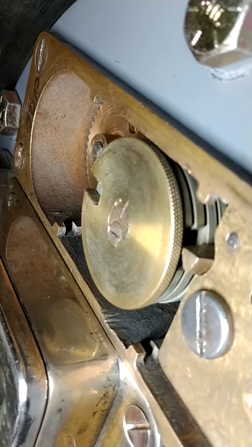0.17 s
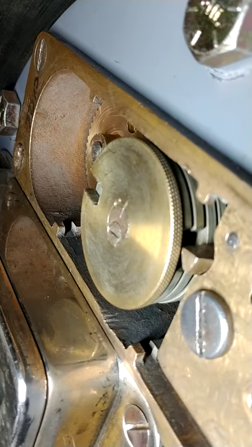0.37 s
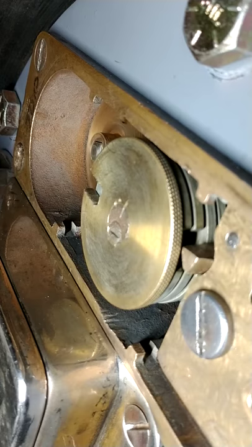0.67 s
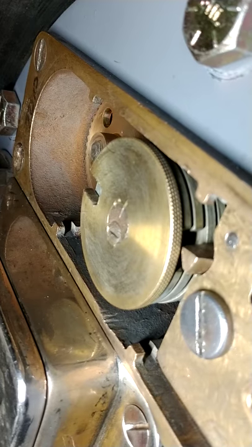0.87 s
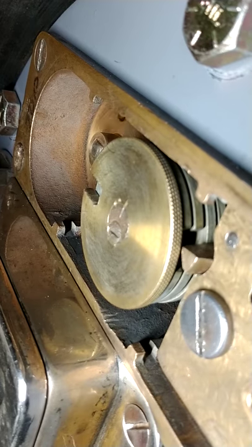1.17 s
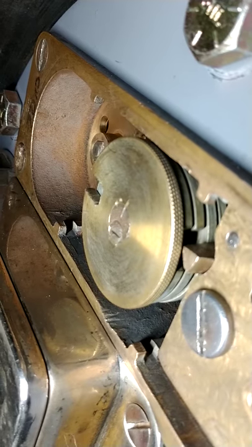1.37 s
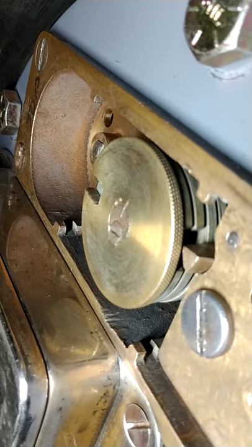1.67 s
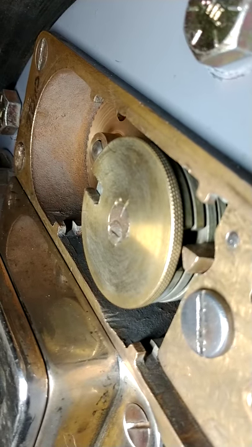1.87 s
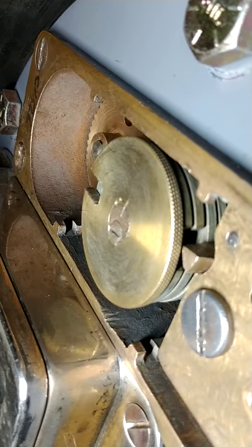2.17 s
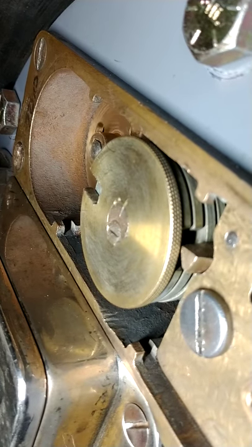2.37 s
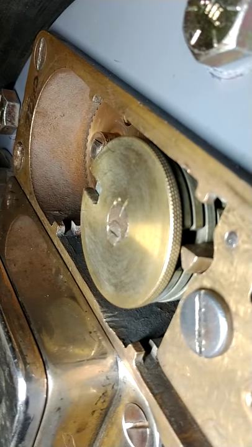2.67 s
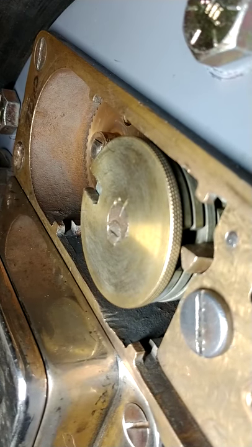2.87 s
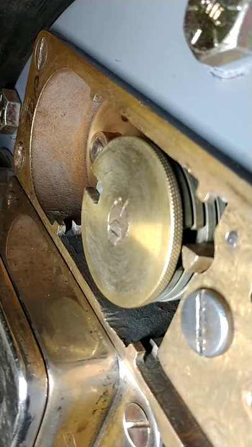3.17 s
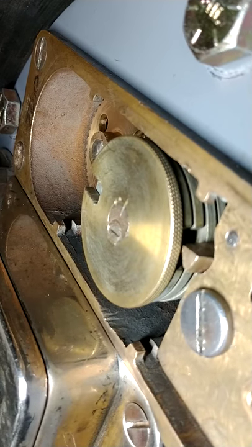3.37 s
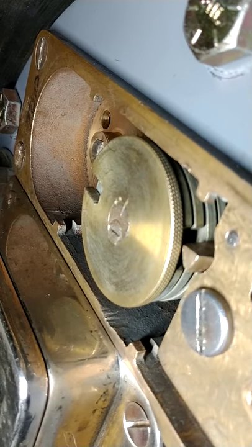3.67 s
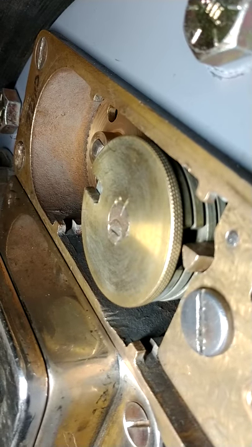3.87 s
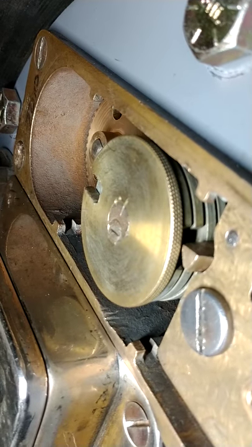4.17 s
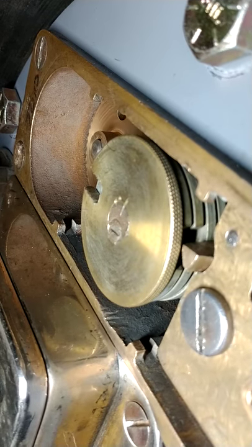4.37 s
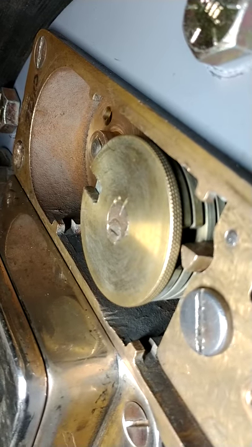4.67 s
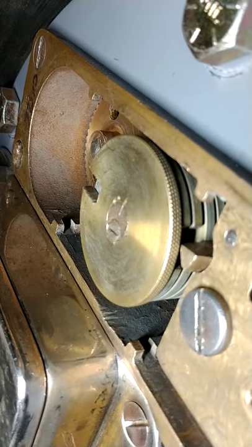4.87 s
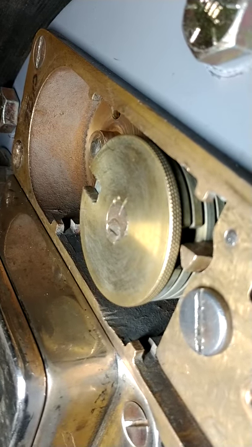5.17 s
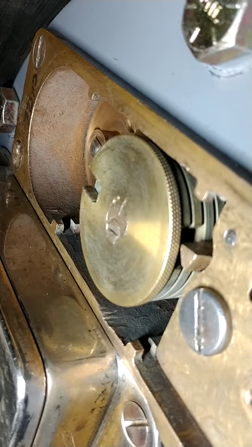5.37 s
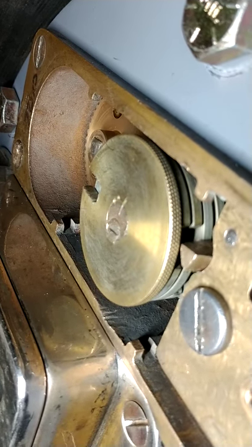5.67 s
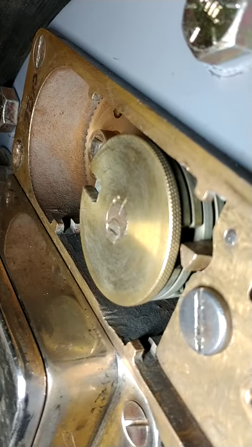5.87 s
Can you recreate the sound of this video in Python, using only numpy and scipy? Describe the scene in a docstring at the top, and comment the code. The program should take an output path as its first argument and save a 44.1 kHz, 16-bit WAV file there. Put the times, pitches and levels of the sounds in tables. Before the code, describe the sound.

Very close to a combination lock in a small room, brass wheels are turned by hand. After half a second of hiss, a dense loud cluster of pinging clinks and rasping erupts, then lighter tooth-tick runs, scattered clicks, a second strong cluster around three seconds, a pause, and sparser ticks to the end. A thin high electronic sizzle sits to the right.

```python
"""A small room, the microphone pair close to a combination safe lock whose brass wheel pack is turned by hand.
Gear teeth tick past in runs; single clinks and the stronger tooth ticks knock, ping and ring the wheels.
Struck parts are decaying modes plus coloured noise bursts; rubbing brass is a dense run of tiny random slips.
Short diffuse reflections follow. Behind lie a faint door rumble with dull bumps, hiss and, to the right,
a thin wavering high band of narrow noises: electronic sizzle, plus treble of the loud clinks near .74 s."""
import sys
import numpy as np
from scipy import signal
from scipy.fft import rfft, irfft, next_fast_len
from scipy.io import wavfile

SR = 44100
rng = np.random.default_rng(int(sys.argv[2]) if len(sys.argv) > 2 else 0)


def dump(signal):
    """Clip the signal to [-1, 1] and save it as 16-bit WAV at the path in sys.argv[1]."""
    limited = np.clip(np.atleast_2d(signal).T, -1, 1)
    pcm = np.round(limited * 32767).astype(np.int16)
    wavfile.write(sys.argv[1], SR, pcm)


N = 265305  # samples, about 6 s
TIME = np.arange(N) / SR
RING_TIME = np.arange(SR // 3) / SR  # time axis of one ring or reflection tail
# Levels in the tables are relative: each layer gets its own gain on top.
# side_db is left over right; t60_s is the time to fall by 60 dB.


def amp(db):
    """Decibels to gain."""
    return 10 ** (np.asarray(db) / 20)


def unit(x):
    """Scales to rms 1."""
    return x / np.sqrt(np.mean(x ** 2) + 1e-20)


def read(points, hz):
    """Joins (Hz, value) points on a log-frequency axis."""
    f, value = np.transpose(points)
    return np.interp(np.log(hz + 1), np.log(f), value)


def sides(balance_db):
    """Left and right gains of mean power 1."""
    pair = amp(np.array([np.atleast_1d(balance_db), -np.atleast_1d(balance_db)]) / 2)
    return pair / np.sqrt(np.mean(pair ** 2, 0))


def dying(t60):
    """Exponential amplitude envelope of a free vibration."""
    return np.exp(-np.log(1000) * RING_TIME / max(t60, 1e-4))


ATTACK = (1 - dying(0.0038)) ** 2  # soft onset of every ringing mode


def add(mix, s, sound):
    """Mixes a sound in at time s."""
    part = mix[..., max(round(s * SR), 0):][..., :sound.shape[-1]]
    part += sound[..., :part.shape[-1]]


def arch(first, middle, last, count):
    """Samples a parabola through its first, middle and last values."""
    u = np.linspace(0, 1, count)
    bend = 2 * (2 * middle - first - last)
    return first + (last - first) * u + bend * u * (1 - u)


def colour(x, points, size=4096):
    """Minimum-phase filter of unit energy with the given spectrum."""
    hz = abs(np.fft.fftfreq(size, 1 / SR))
    log_gain = np.log(amp(read(points, hz)))
    spectrum = np.exp(np.conj(signal.hilbert(log_gain)))
    taps = np.fft.ifft(spectrum).real[:size // 2]
    return signal.oaconvolve(x, taps[None] / np.linalg.norm(taps), axes=1)[:, :N]


def noise_pair(likeness, size):
    """Left and right noises with the given correlation."""
    a, b = rng.standard_normal((2, size))
    c = np.clip(likeness, 0, 1)
    return np.array([a, c * a + np.sqrt(1 - c * c) * b])


def bursts(times, levels_db, crack_t60, body_t60, body_db, likeness, rise_t60=0.0062):
    """Each contact builds, cracks, then dies away in the dense modes of the metal, heard as noise."""
    power = np.zeros(N)
    crack = dying(crack_t60) ** 2
    body = (amp(body_db) * dying(body_t60)) ** 2
    shape = (crack + body) * (1 - dying(rise_t60)) ** 2
    for s, db in zip(times, levels_db):
        add(power, s, amp(db) ** 2 * shape)
    return np.sqrt(power) * noise_pair(likeness, N)


def ringing(modes, times, drive_db, scatter_db, spread):
    """Strikes modes with drive_db of shape (blows, modes); each blow lands on a slightly different spot."""
    out = np.zeros((2, N))
    chance = rng.standard_normal((len(times), len(modes), 2))
    left_phase = spread * rng.standard_normal(len(modes))  # radians, left microphone only
    for k, (hz, db, t60, side_db) in enumerate(modes):
        envelope = np.sqrt(2) * amp(db) * dying(t60) * ATTACK
        wave = (envelope * np.exp(2j * np.pi * hz * RING_TIME))[:int(t60 * SR) + 200]
        pair = sides(side_db) * np.exp(1j * left_phase[k] * np.array([[1], [0]])) * wave
        for s, blow_db, (luck, lag) in zip(times, drive_db[:, k], chance[:, k]):
            add(out, s, amp(blow_db + scatter_db * luck) * (pair * np.exp(.5j * lag)).imag)
    return out


# Left-right balance of sound through the plates: hz [Hz], side_db [dB]
PLATE_SIDE = [(500, -2.5), (1050, -7), (1750, 7), (2400, 0), (3100, -6), (3750, -20), (4700, -10.5),
              (6500, -8.5), (8500, -4), (11000, -3.5), (13000, -17.5)]


def at_microphones(x, lag_s=0.0002):
    """Plate sound reaches each microphone at a level set by its frequency, the left one slightly later."""
    size = next_fast_len(N + len(RING_TIME))
    hz = np.fft.rfftfreq(size, 1 / SR)
    delay = np.exp(-2j * np.pi * hz * np.array([[lag_s], [0]]))
    return irfft(rfft(x, size) * sides(read(PLATE_SIDE, hz)) * delay, size)[:, :N]


# Colour of a knock through the lock plates: hz [Hz], level_db [dB]
KNOCK_COLOUR = [(60, -58), (300, -30.5), (500, -16), (660, -17.5), (950, -6.5), (1180, -7.5), (1550, -1),
                (2300, -3.5), (3150, 9), (3550, 7.5), (4700, 9.5), (6200, 1.5), (8500, -18), (16000, -30.5)]
# Short-lived modes of the lock plates: pitch_hz [Hz], level_db [dB], t60_s [s], side_db [dB]
PLATE_MODES = [(958.7, -7, 0.098, -10), (1160, -6, 0.035, -8.5), (1367, -8.5, 0.022, -1),
               (1526, -2.5, 0.022, -2), (1750, -6, 0.038, 5), (1976, -3.5, 0.034, 0.5),
               (2358, -8.5, 0.034, 3), (2622, -6, 0.04, -15), (2726, -6.5, 0.048, 0), (3085, 3, 0.025, -6),
               (3200, -5, 0.088, -10), (3206, 0, 0.11, -7), (4620, -3, 0.05, -7.5),
               (5525, -10.5, .11, -3.5)]


def knocks(blows):
    """Every contact knocks on the plates and rings their modes briefly."""
    s, db = blows[:, 0], blows[:, 1]
    crack = bursts(s, db, crack_t60=0.0047, body_t60=0.058, body_db=-3, likeness=.4)
    crack = at_microphones(colour(crack, KNOCK_COLOUR))
    drive_db = db[:, None] + np.zeros(len(PLATE_MODES))
    ring = ringing(PLATE_MODES, s, drive_db, scatter_db=3, spread=1.64)
    return amp(-0.5) * crack + amp(-13.0) * ring


def pings(blows, t60=0.034, harder=0.51, rise_t60=0.0075, side_db=-16,
          low_hz=3875, high_hz=4180, after_db=-13, after_t60=0.11):
    """The sharp ping of the mechanism; a close pair of modes beats on after it, more so when struck hard."""
    out = np.zeros(N)
    low_wave = np.sin(2 * np.pi * low_hz * RING_TIME)
    high_wave = np.sin(2 * np.pi * high_hz * RING_TIME)
    rise = (1 - dying(rise_t60)) ** 2
    for s, _, db, hz in blows:
        strike = dying(t60) * np.sin(2 * np.pi * hz * RING_TIME)
        high = np.clip((hz - low_hz) / (high_hz - low_hz), .15, .85)  # share of the upper mode
        pair = (1 - high) * low_wave + high * high_wave
        beat = amp(after_db + harder * max(db + 32, 0)) * dying(after_t60) * pair
        add(out, s, np.sqrt(2) * amp(db) * (strike + beat) * rise)
    return amp(-0.5) * out * sides(side_db)


# Brass wheel modes, low to high: pitch_hz [Hz], level_db [dB], t60_s [s], side_db [dB]
WHEEL_MODES = [(5597, -6, .14, -1), (5648, -3, .15, -3), (6622, -10, .17, -2), (7299, -10, .1, -4),
               (7351, -4, .13, -8), (7546, -9, .12, -6), (8349, -12, .13, 0), (10222, -9, .15, -4),
               (10553, -6, .17, -5), (13019, -7, .14, -12), (13578, -4, .1, -6), (14420, -11, .1, -18)]


def wheels(blows):
    """Every contact rings the wheels; brighter ones wake the higher modes."""
    s, _, _, _, ring_db, tilt_db = blows.T
    hz = np.array(WHEEL_MODES)[:, 0]
    drive_db = ring_db[:, None] + tilt_db[:, None] * np.log2(hz / hz[0])
    return ringing(WHEEL_MODES, s, drive_db, scatter_db=3, spread=1.6)


# Dull thuds of the case as a wheel takes up the load: start_s [s], thud_db [dB], boom_db [dB]
LOAD_THUDS = [(0.561, -43.5, -62), (.752, -41, -53), (.812, -32.5, -50), (1.158, -64, -52.5),
              (1.973, -51.5, -62), (2.442, -36, -52), (2.655, -40, -60), (3.089, -42, -57),
              (3.107, -32, -50), (4.349, -67, -94.5), (4.648, -33, -51.5), (5.451, -35, -59),
              (5.991, -51.5, -53.5)]
# Bright snaps of an edge slipping free: start_s [s], level_db [dB]
EDGE_SNAPS = [(0.538, -25), (.75, -19), (2.437, -24), (2.998, -39), (4.525, -39), (4.646, -18)]
# Overtones of a hard ping: pitch_hz [Hz], level_db [dB], t60_s [s], side_db [dB]
PING_OVERTONES = [(4889, 0, .14, -5), (5459, -3, .11, -10)]
# Hollow boom of the case: pitch_hz [Hz], level_db [dB], t60_s [s], side_db [dB]
CASE_BOOM = [(495, -1.5, 0.059, -4.5)]
# Colour of the hollow lock case: hz [Hz], level_db [dB]
CASE_COLOUR = [(60, -59), (250, -34.5), (400, -21), (490, -1.5), (620, -15), (720, -11), (800, 1.5),
               (890, -5.5), (970, 10), (1120, -1), (1350, -18.5), (1750, -17), (3000, -30.5), (8000, -52)]
# Colour of a hard edge-on snap: hz [Hz], level_db [dB]
SNAP_COLOUR = [(1000, -29), (4500, -3.5), (7000, -4.5), (9000, 0), (11000, 5.5), (13000, 5.5),
               (15800, -8.5)]
THUD_UNDER_DB = -17  # a clink's thud relative to its knock
SNAP_FROM_DB, SNAP_GROWTH = -24, 1.7  # snap equals knock at this level; dB of snap per dB of knock
OVERTONE_FROM_DB, OVERTONE_GROWTH = -12, 1.4  # likewise for overtones against the ping


def clinks(strong):
    """Strong contacts also thud the case and, the harder the blow, have more overtones and snap."""
    s, knock_db, ping_db = strong.T[:3]
    loads = np.array(LOAD_THUDS)
    clink_thuds = np.column_stack([s, knock_db + THUD_UNDER_DB])
    thuds = np.vstack([clink_thuds, loads[:, :2]])
    clink_snap_db = SNAP_FROM_DB + SNAP_GROWTH * (knock_db - SNAP_FROM_DB)
    snaps = np.vstack([np.column_stack([s, clink_snap_db]), EDGE_SNAPS])
    overtone_db = OVERTONE_FROM_DB + OVERTONE_GROWTH * (ping_db - OVERTONE_FROM_DB)
    drive_db = overtone_db[:, None] + np.zeros(len(PING_OVERTONES))
    overtones = ringing(PING_OVERTONES, s, drive_db, scatter_db=3, spread=1.6)
    boom = ringing(CASE_BOOM, loads[:, 0], loads[:, 2:], scatter_db=1, spread=.3)
    thud = bursts(*thuds.T, crack_t60=0.035, body_t60=0.069, body_db=-3.5, likeness=0.75, rise_t60=.005)
    thud = colour(thud, CASE_COLOUR) * sides(-4)
    snap = bursts(*snaps.T, crack_t60=.012, body_t60=0.046, body_db=-2.5, likeness=0.93)
    snap = at_microphones(colour(snap, SNAP_COLOUR))
    return amp(-23) * overtones + amp(-3.0) * thud + amp(-3.0) * boom + amp(-4.5) * snap


# Runs of gear teeth; a push may hold more than one run: start_s [s], teeth [count],
# gap_start_s, gap_mid_s, gap_end_s [s between teeth]
TOOTH_RUNS = [(1.187, 11, .0221, .0171, .038), (2.4803, 9, .0274, .0189, .0343),
              (3.1405, 13, .0178, .0161, .0301), (4.525, 4, .025, .028, .029),
              (4.6758, 6, .0278, .0226, .0366), (5.3627, 14, .0275, .0277, .0317)]
# Force of each run: knock_start_db, knock_mid_db, knock_end_db [dB], ping_start_db, ping_end_db [dB over
# knock], pitch_hz [Hz, mean ping], ring_db [dB, wheel ring over knock]
TOOTH_FORCE = [(-46, -38.5, -41.5, 5.5, -4, 4170, -11.5), (-40.5, -46.5, -43, 3.5, 1, 3600, -12.5),
               (-39, -35.5, -40, -6, -7, 4120, -11.5), (-54, -59.5, -52, 5, 2, 4230, -8.5),
               (-41.5, -46.5, -58, 3, 2.5, 4160, -14), (-46, -44, -51.5, 13, -9, 3950, -22.5)]
TOOTH_SCATTER_DB, TOOTH_PING_SCATTER_DB, TOOTH_SCATTER_HZ = 2.5, 3, 60  # no two teeth meet alike
TOOTH_TILT_DB = -13.5  # dB per octave: these teeth wake the high wheel modes less


def teeth():
    """Gear teeth tick past at the speed of the hand; gives rows like those of STRONG_CONTACTS."""
    rows = []
    for (start, count, *gaps), force in zip(TOOTH_RUNS, TOOTH_FORCE):
        first, middle, last, ping_first, ping_last, hz, ring_db = force
        s = start + np.append(0, np.cumsum(arch(*gaps, count=count - 1)))
        luck, spot, detune = rng.standard_normal((count, 3)).T
        knock_db = arch(first, middle, last, count=count) + TOOTH_SCATTER_DB * luck
        ping_db = knock_db + np.linspace(ping_first, ping_last, count) + TOOTH_PING_SCATTER_DB * spot
        ping_hz = hz + TOOTH_SCATTER_HZ * detune
        tilt_db = np.full(count, TOOTH_TILT_DB)
        rows.append(np.column_stack([s, knock_db, ping_db, ping_hz, knock_db + ring_db, tilt_db]))
    return np.vstack(rows)


SLIDE_FALL_DB, SLIDE_FALL_BEND = 32, 1.3  # fall reached at end_s; above 1 it starts slowly


def slide(start, fullest, end):
    """Strength of one slide: it swells smoothly, then dies away, still falling past its end."""
    swell = np.sin(np.pi / 2 * np.clip((TIME - start) / (fullest - start), 0, 1)) ** 2
    fall = np.clip((TIME - fullest) / (end - fullest), 0, 2) ** SLIDE_FALL_BEND
    return swell * amp(-SLIDE_FALL_DB * fall)


# Wheels sliding on each other: start_s, fullest_s, end_s [s], rasp_db [dB, on the rims],
# drag_db [dB, on the case]
WHEEL_SLIDES = [(.6, .73, .88, -24, -46), (1.14, 1.27, 1.55, -45.5, -87), (1.708, 1.82, 2.1, -47, -58),
                (2.3, 2.665, 2.73, -45, -65), (3.68, 3.74, 4.03, -50, -88), (4.443, 4.698, 4.9, -51.5, -73),
                (5.19, 5.256, 5.33, -61, -66.5), (5.45, 5.7, 5.8, -58.5, -67)]
# Tones that the rims sing when rubbed: pitch_hz [Hz], level_db [dB], t60_s [s]
RIM_TONES = [(3280, -14, .1), (3900, -2, .2), (4030, 0, .22), (4230, -4, .12), (4950, -7, .12),
             (5600, -6, .15)]
# Colour of the rasp: hz [Hz], level_db [dB]
RASP_COLOUR = [(300, -55), (1500, -31), (2900, -24.5), (3600, -12.5), (3900, 15.5), (4200, 4.5),
               (4450, -2.5), (4750, -1.5), (5400, -14.5), (6700, -14), (8500, -31), (16000, -44)]


def rubbing():
    """Brass on brass: many tiny slips, each a short rasp that sounds the case and sets the rims singing."""
    slips_per_s, uneven_db, slip_t60, smooth = 320, 2.5, .012, .6  # smooth: steady part of the grain
    slips = (rng.random(N) < slips_per_s / SR) * amp(uneven_db * np.minimum(rng.exponential(1, N), 3))
    slip_power = signal.oaconvolve(slips ** 2, dying(slip_t60) ** 2)[:N]
    grain = unit(smooth + unit(np.sqrt(abs(slip_power))))
    pressure = sum(amp([[rasp_db], [drag_db]]) * slide(*times) for *times, rasp_db, drag_db in WHEEL_SLIDES)
    on_rims, on_case = grain * pressure
    scrape = on_rims * noise_pair(0.4, N)
    rim = sum(amp(db) * dying(t60) * np.sin(2 * np.pi * hz * RING_TIME) for hz, db, t60 in RIM_TONES)
    rim = rim * (1 - dying(.008)) ** 2  # soft onset
    sing = signal.oaconvolve(scrape, rim[None] / np.linalg.norm(rim), axes=1)[:, :N]
    drag = colour(on_case * noise_pair(0.63, N), CASE_COLOUR) * sides(-7.5)
    rasp = colour(scrape, RASP_COLOUR)
    return at_microphones(amp(-4) * rasp + amp(-7) * sing) + amp(-2.0) * drag


def room(x, gap_s=0.0016):
    """Diffuse reflections of a small room, fading in after a short gap; the treble dies first."""
    hz, t, z = signal.stft(rng.standard_normal((2, len(RING_TIME))), SR, nperseg=256)
    t60 = read([(900, .26), (4000, .24), (9000, .17)], hz)[:, None]  # (Hz, s)
    tail = signal.istft(z * np.exp(-np.log(1000) * t / t60), SR, nperseg=256)[1][:, :len(RING_TIME)]
    tail = tail * np.clip(RING_TIME / gap_s - 1, 0, 1)
    return signal.oaconvolve(x, tail / np.linalg.norm(tail[0]), axes=1)[:, :N]


# Dull bumps of the door: start_s [s], level_db [dB]
DOOR_BUMPS = [(.748, -56), (.795, -63.5), (5.507, -53.5), (5.54, -64), (5.779, -68.5), (5.862, -71.5)]
# Colour of the door's rumble and bumps: hz [Hz], level_db [dB]
DOOR_COLOUR = [(20, -25), (45, -11.5), (80, 0), (150, 1), (260, -5.5), (450, -17), (900, -25.5)]
RUMBLE_DB = -85.5


def door():
    """The heavy door rumbles faintly and bumps under the hand: low-coloured noise, steady and in bursts."""
    s, db = np.transpose(DOOR_BUMPS)
    bumps = bursts(s, db, crack_t60=0.075, body_t60=.25, body_db=-10.5, likeness=0.96, rise_t60=0.0091)
    rumble = amp(RUMBLE_DB) * noise_pair(0.16, N)
    return colour(bumps * sides(-11.0) + rumble, DOOR_COLOUR)


# Colour of the steady hiss: hz [Hz], level_db [dB]
HISS_COLOUR = [(100, 2.5), (1000, 0.5), (3500, 0.5), (6000, -6), (8000, -3), (10000, 8), (11500, 9),
               (13000, 11.5), (15700, 13), (16000, -6.5)]


def steady_hiss(hiss_db=-73):
    """Independent coloured noise at each microphone."""
    return amp(hiss_db) * colour(rng.standard_normal((2, N)), HISS_COLOUR)


# Narrow bands of the high noise: pitch_hz [Hz], width_hz [Hz], level_db [dB]
HIGH_BANDS = [(11550, 25, -10), (12017, 36, -1), (12055, 70, 2), (12260, 50, -12.5), (13000, 110, -5),
              (12700, 60, -1.5), (13440, 120, -12), (13900, 53, -20), (14600, 88, -2), (14800, 50, -4.5),
              (15200, 55, -10.5), (15200, 46, -5.5)]
# Strength of the high band, sizzle plus treble of the loud clinks at .74 s: start_s [s], level_db [dB]
HIGH_BAND_STRENGTH = [(0, -57), (.5, -56.5), (.74, -46), (.99, -58), (3.64, -57), (3.99, -52.5),
                      (4.25, -57.5), (6.02, -59.5)]


def high_band(side_db=-30, waver_db=1.3):
    """Electronic sizzle and loud clinks' treble: narrow-band noise far right, wavered by 1 to 14 Hz sines."""
    hz = np.fft.rfftfreq(N, 1 / SR)
    bands = sum(amp(db) ** 2 / abs(width) / (1 + ((hz - f) / width) ** 2) ** 2 for f, width, db in HIGH_BANDS)
    noise = unit(irfft(rfft(rng.standard_normal(N)) * np.sqrt(bands), N))
    rates_hz = np.geomspace(1, 14, 20)
    waver = unit(sum(np.sin(2 * np.pi * (f * TIME + rng.random())) / np.sqrt(f) for f in rates_hz))
    level_db = np.interp(TIME, *np.transpose(HIGH_BAND_STRENGTH)) + waver_db * waver
    return amp(3.5) * amp(level_db) * noise * sides(side_db)


# Single clinks and the stronger tooth ticks of the lock: start_s [s], knock_db [dB], ping_db [dB],
# pitch_hz [Hz, ping], ring_db [dB, wheel ring], tilt_db [dB per octave, brightness of the ring]
STRONG_CONTACTS = [(.539, -29.5, -21.5, 4054, -23, -12), (.625, -37, -32, 4190, -48.5, -9),
                   (.651, -28, -24.5, 4200, -34.5, -2.5), (.662, -32, -30.5, 4250, -33.5, -18),
                   (.678, -26, -13, 3980, -26, -14.5), (.693, -27, -17.5, 3955, -32, -5),
                   (.712, -32.5, -15, 4280, -35, 8), (.724, -28.5, -16.5, 4190, -34.5, 10.5),
                   (.737, -27, -9, 4177, -37.5, 10), (.75, -27, -6.5, 4143, -26, -0.5),
                   (.793, -16, -14, 4180, -24.5, -10), (.812, -24, -19, 3840, -29, -9),
                   (.83, -22.5, -9.5, 3964, -29.5, -7.5), (.859, -27, -16, 4020, -36, 0.5),
                   (1.152, -46, -34, 4004, -41, -40), (1.226, -58, -41, 4170, -40, -24),
                   (1.296, -42, -25.5, 4240, -43, -5.5), (1.341, -35, -23, 4177, -65, -10),
                   (1.411, -47.5, -31, 4216, -53, -10), (1.441, -39, -29, 4106, -38, -40),
                   (1.825, -54, -25, 3997, -61, -8), (1.851, -45, -26.5, 3918, -41, -19.5),
                   (2.393, -54, -53.5, 3830, -61, -5), (2.426, -52, -44, 4090, -54.5, -9),
                   (2.44, -25.5, -21.5, 4085, -44.5, -10), (2.606, -57, -30.5, 4240, -57, -14.5),
                   (2.634, -40, -27, 4230, -61, -13), (2.657, -48, -26, 3980, -64, -7),
                   (2.673, -36.5, -24, 4010, -60, -15), (2.705, -43.5, -25, 3883, -54.5, -8),
                   (2.998, -53, -41.5, 4010, -59.5, 10.5), (3.039, -49, -31, 3980, -61, -16),
                   (3.058, -39, -25.5, 4310, -59, -10), (3.071, -26, -12.5, 4180, -37.5, -14),
                   (3.089, -22, -10, 4074, -28, -18), (3.107, -26.5, -13.5, 3874, -27, -19),
                   (3.124, -28, -20, 3950, -45, 3.5), (3.271, -40, -25, 4240, -45, -14),
                   (3.312, -29.5, -19, 4195, -55, -19), (3.372, -38, -32, 4080, -48, -20),
                   (3.399, -34.5, -29.5, 4140, -42.5, -20), (3.433, -68, -32, 4025, -83.5, -15),
                   (3.692, -59, -34, 4150, -52.5, -13), (4.607, -53, -39, 4300, -43, -36),
                   (4.63, -43.5, -31, 3990, -42, -35), (4.649, -25, -17.5, 4080, -40, -38),
                   (4.85, -64, -45, 3924, -59.5, -38), (5.226, -51, -60.5, 4250, -71, -24),
                   (5.279, -67, -38, 4210, -63, -24), (5.322, -41.5, -25, 4070, -51.5, -26),
                   (5.364, -44, -25.5, 3867, -52, -22), (5.453, -38, -21, 4056, -74, -15),
                   (5.991, -57, -57, 4110, -89, -14.5)]


def scene():
    """The lock up close, its room and the background."""
    strong = np.array(STRONG_CONTACTS, float)
    blows = np.vstack([strong, teeth()])
    struck = knocks(blows) + wheels(blows) + clinks(strong) + rubbing()
    ping = pings(blows[:, :4])
    reflections = room(amp(-7.5) * struck + amp(-16.5) * ping)
    return struck + ping + reflections + door() + steady_hiss() + high_band()


EDGE_HZ = 15900  # upper band limit


def record(dry):
    """The microphone rounds off the loudest peaks; then a steep low-pass limits the band."""
    held = dry / (1 + (dry / .88) ** 6) ** (1 / 6)
    low_pass = signal.firwin(511, EDGE_HZ, window=("kaiser", 9), fs=SR)
    return signal.oaconvolve(held, low_pass[None], "same", axes=1)


dry = scene()
out = record(dry)
dump(out)
```